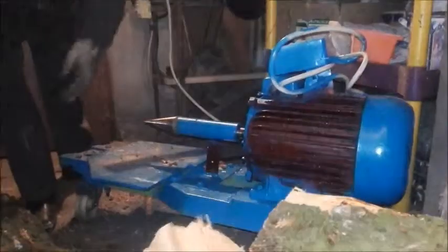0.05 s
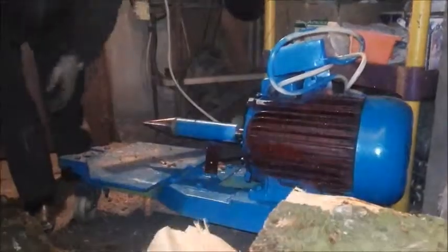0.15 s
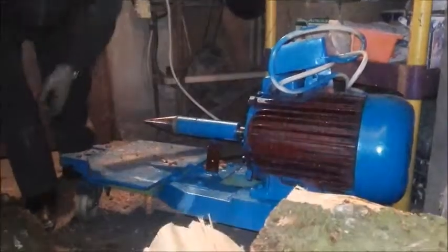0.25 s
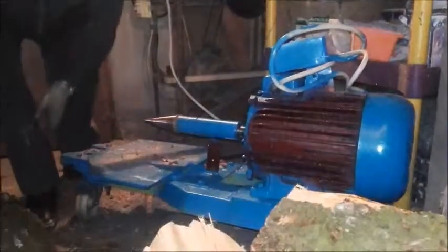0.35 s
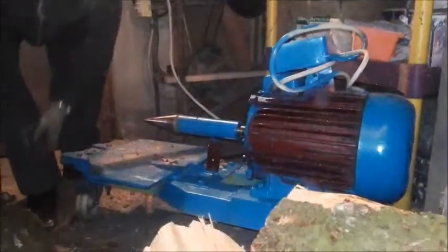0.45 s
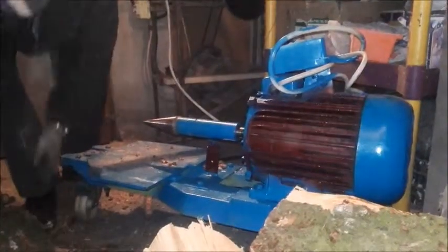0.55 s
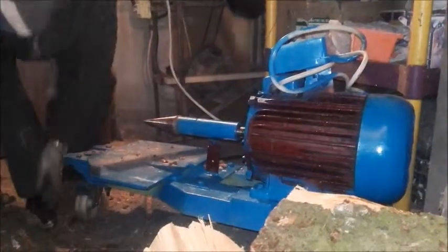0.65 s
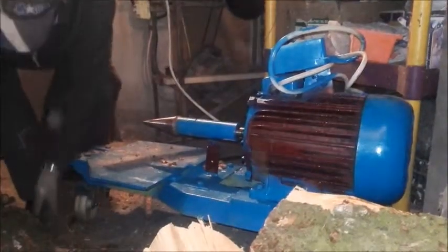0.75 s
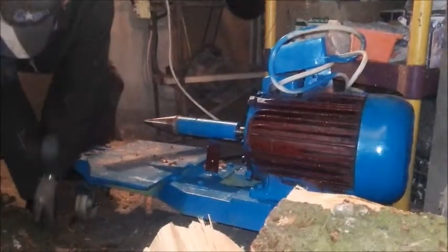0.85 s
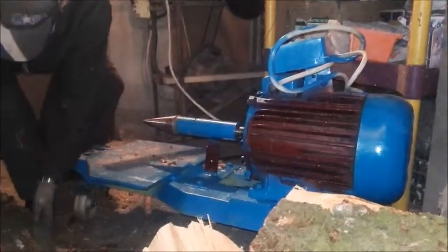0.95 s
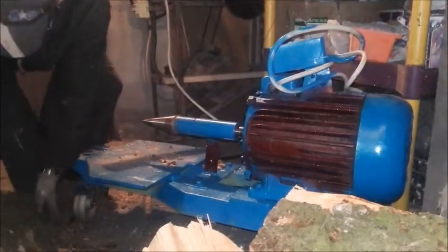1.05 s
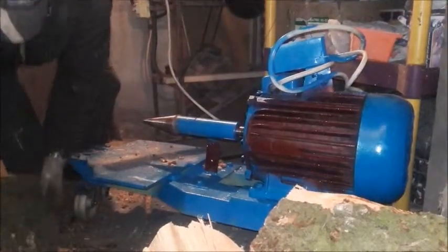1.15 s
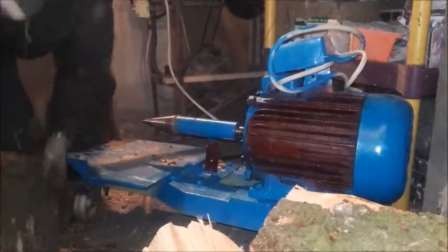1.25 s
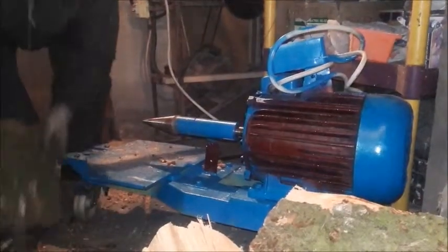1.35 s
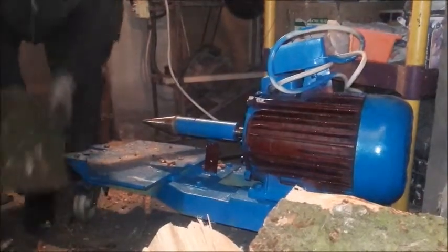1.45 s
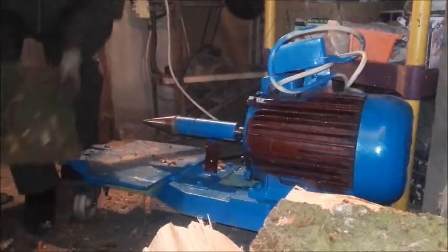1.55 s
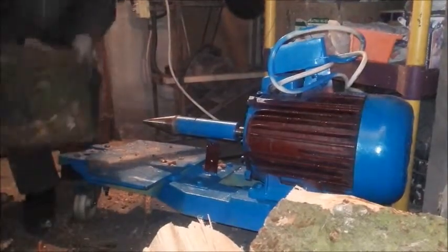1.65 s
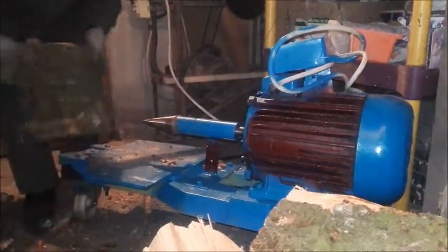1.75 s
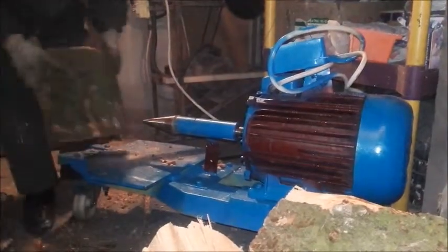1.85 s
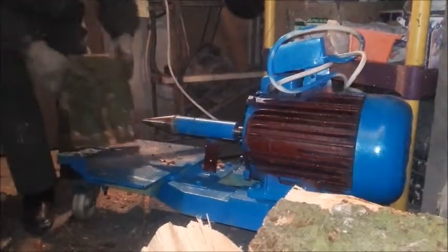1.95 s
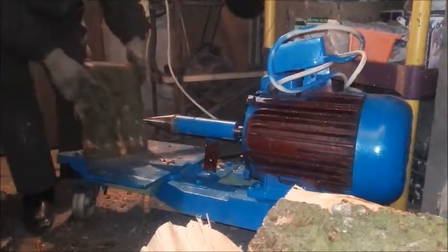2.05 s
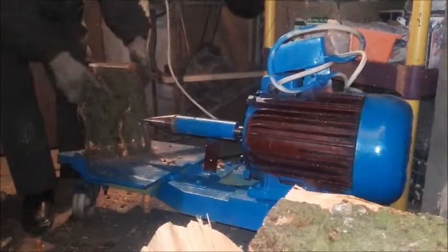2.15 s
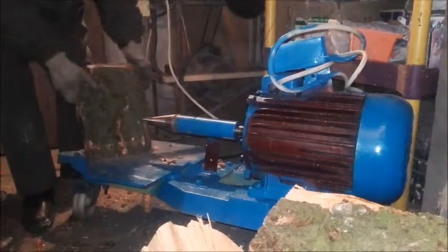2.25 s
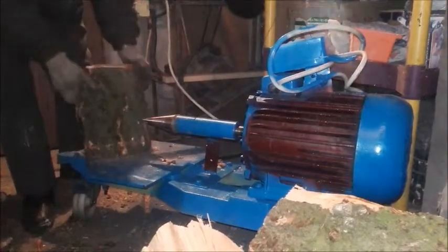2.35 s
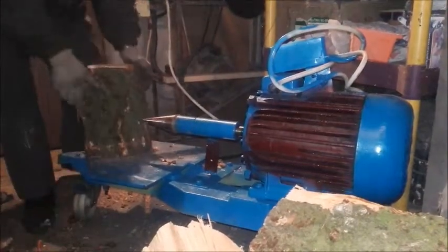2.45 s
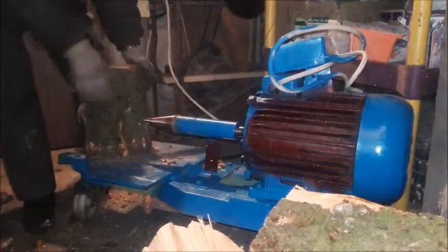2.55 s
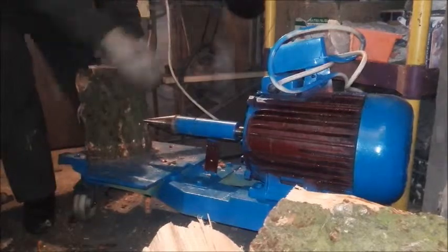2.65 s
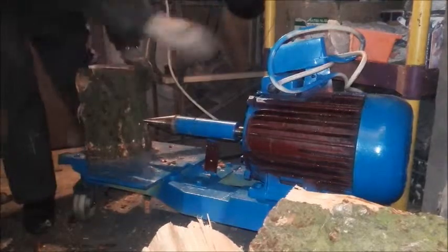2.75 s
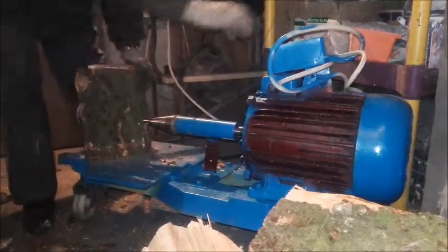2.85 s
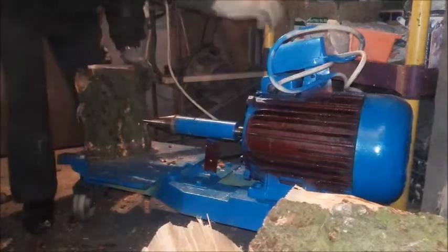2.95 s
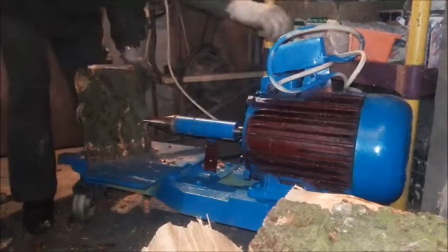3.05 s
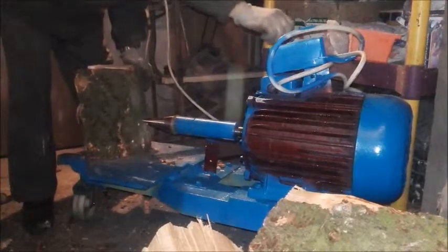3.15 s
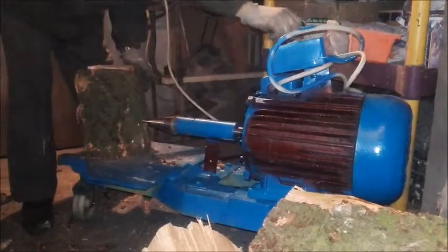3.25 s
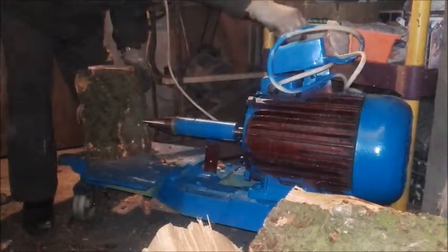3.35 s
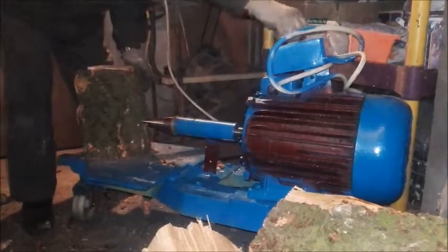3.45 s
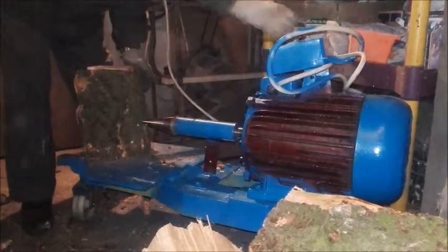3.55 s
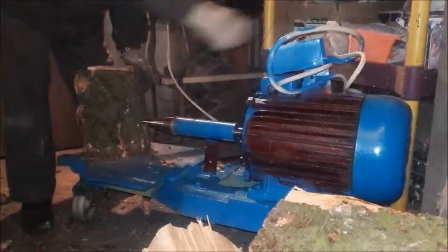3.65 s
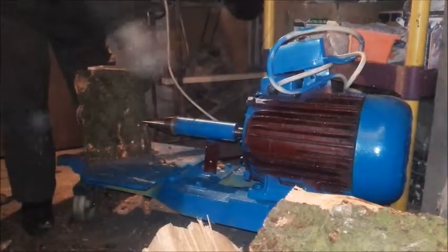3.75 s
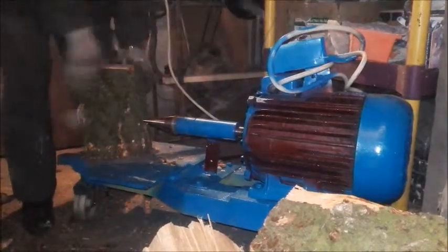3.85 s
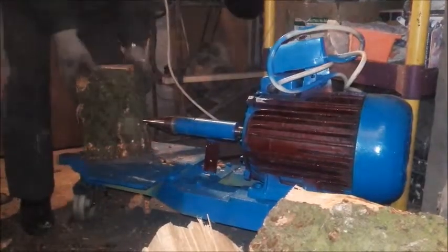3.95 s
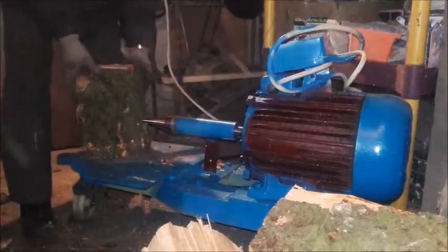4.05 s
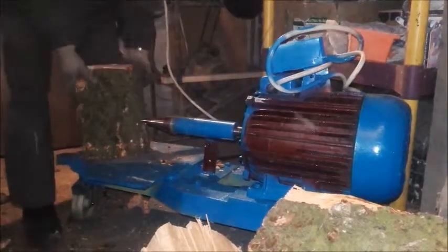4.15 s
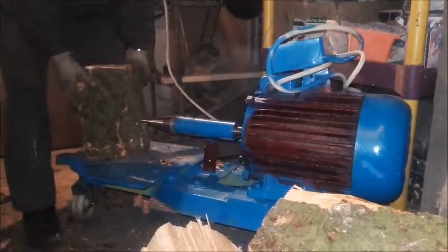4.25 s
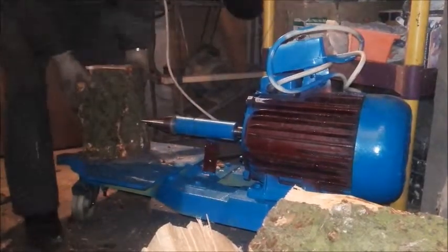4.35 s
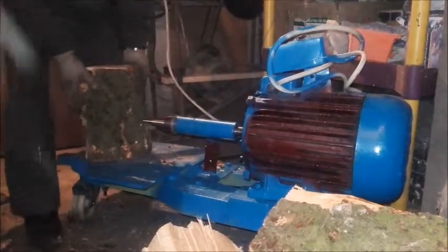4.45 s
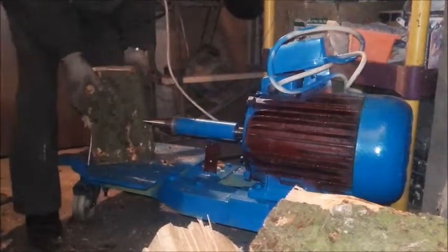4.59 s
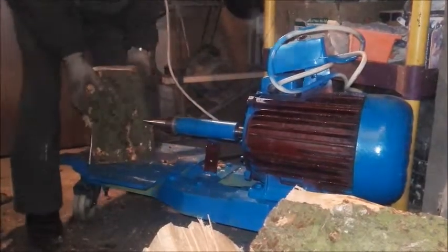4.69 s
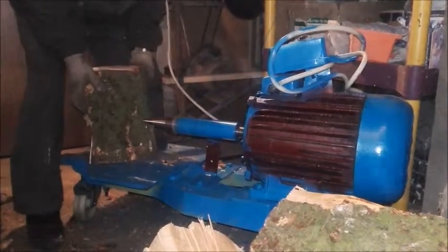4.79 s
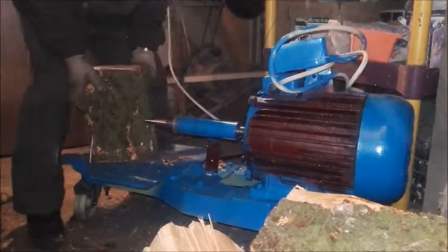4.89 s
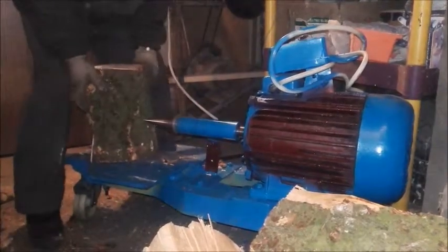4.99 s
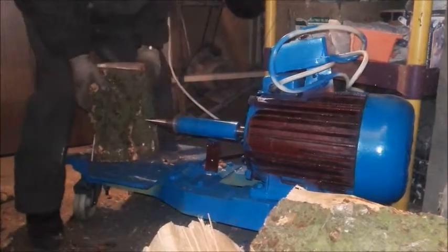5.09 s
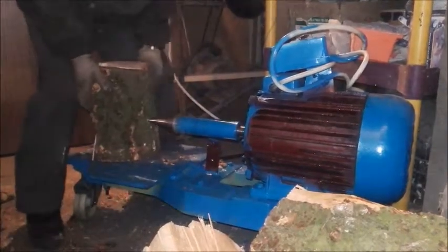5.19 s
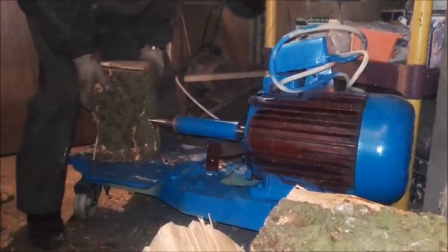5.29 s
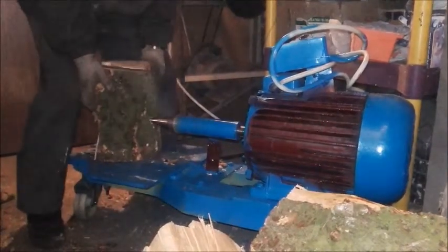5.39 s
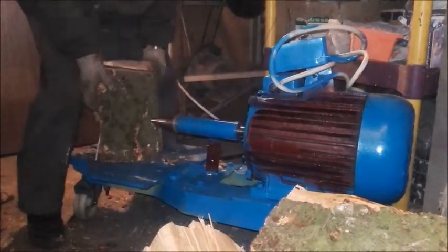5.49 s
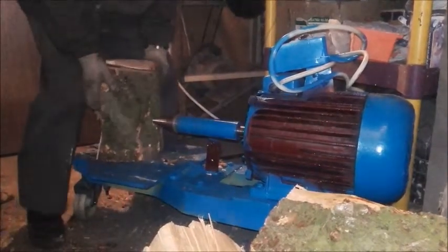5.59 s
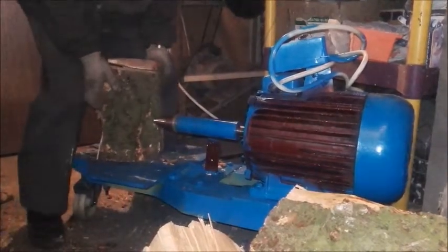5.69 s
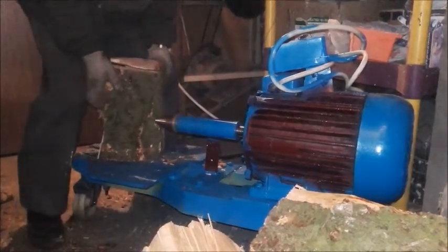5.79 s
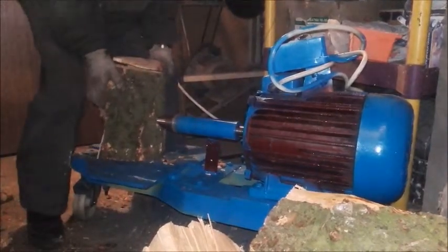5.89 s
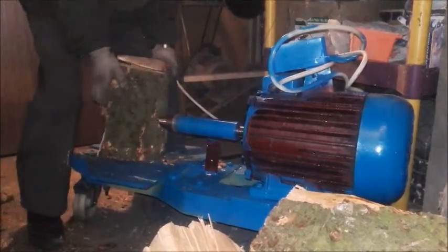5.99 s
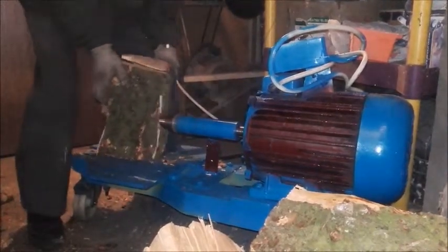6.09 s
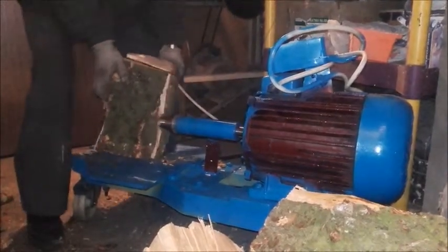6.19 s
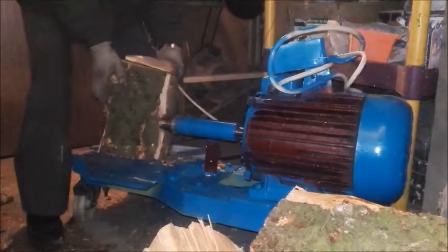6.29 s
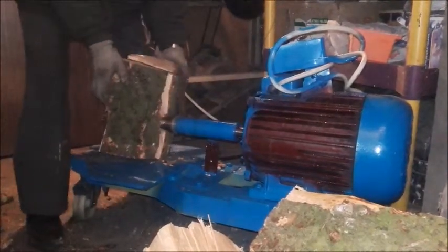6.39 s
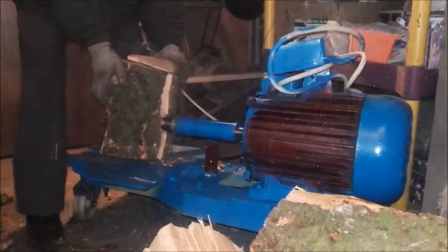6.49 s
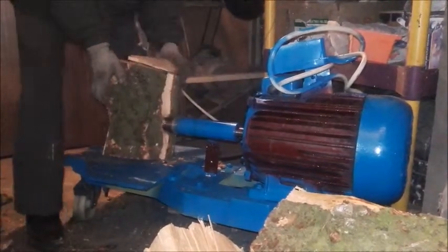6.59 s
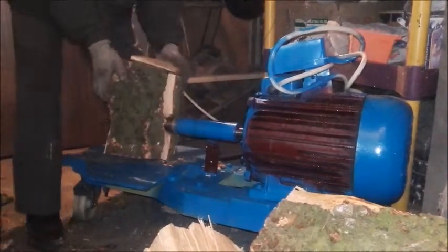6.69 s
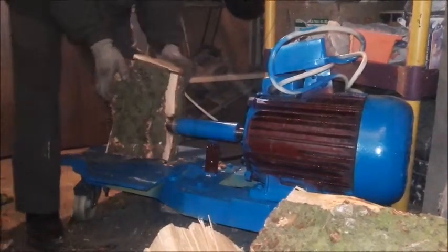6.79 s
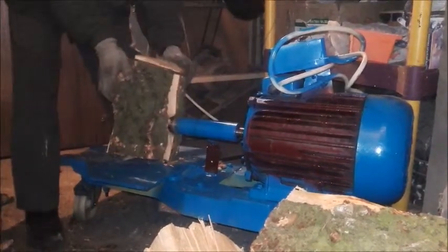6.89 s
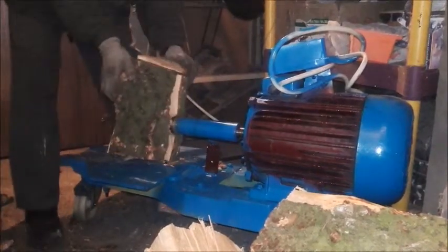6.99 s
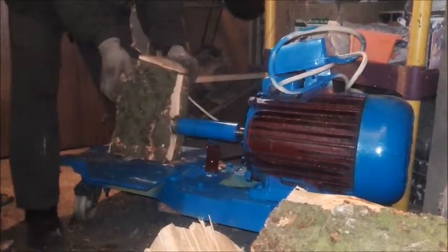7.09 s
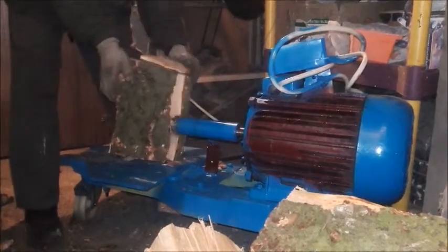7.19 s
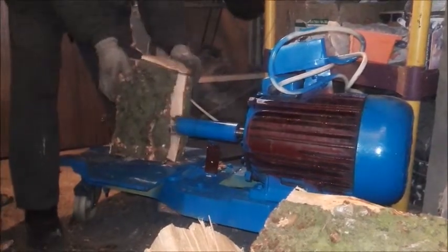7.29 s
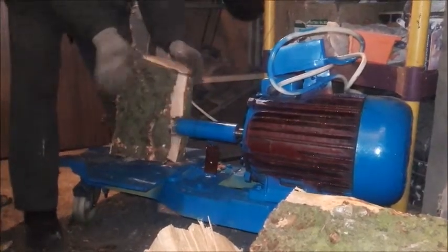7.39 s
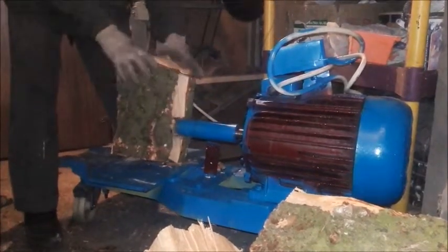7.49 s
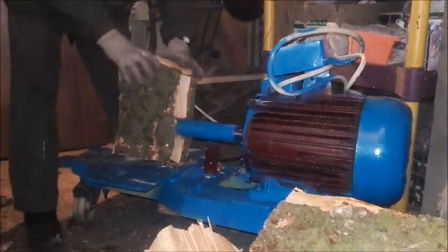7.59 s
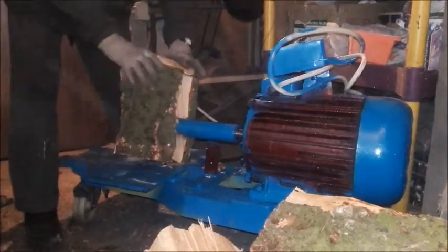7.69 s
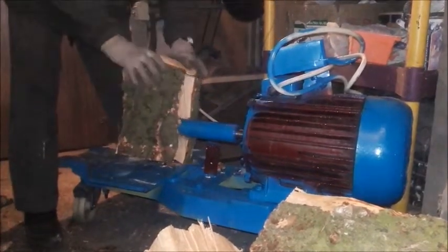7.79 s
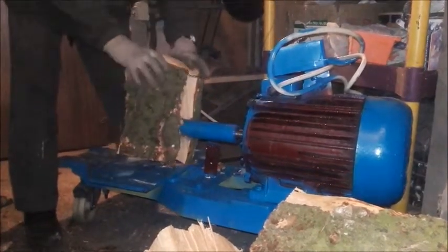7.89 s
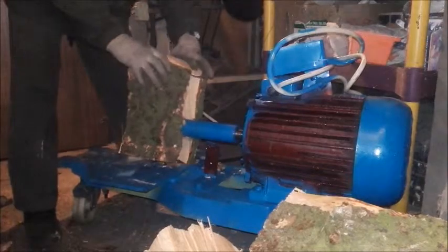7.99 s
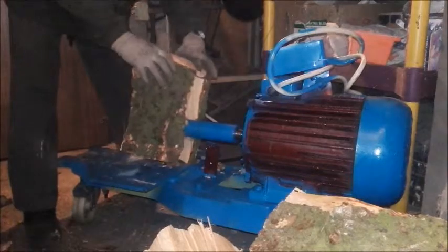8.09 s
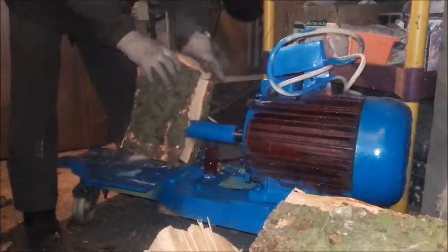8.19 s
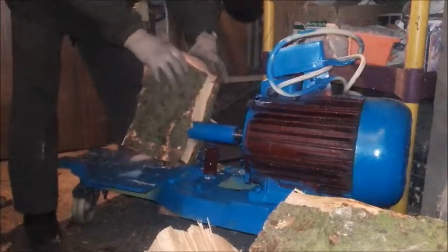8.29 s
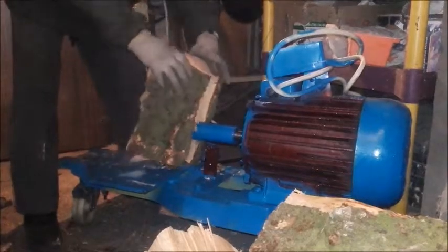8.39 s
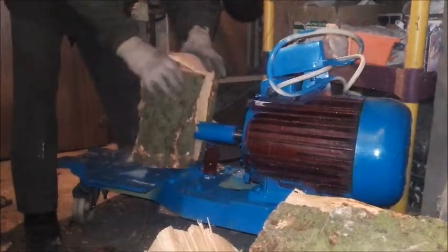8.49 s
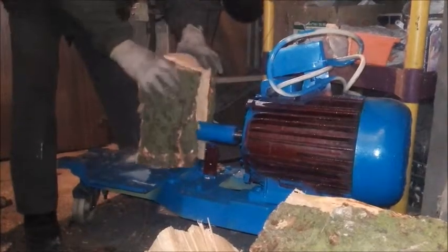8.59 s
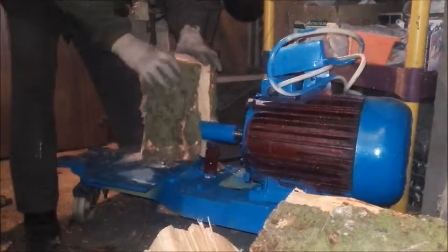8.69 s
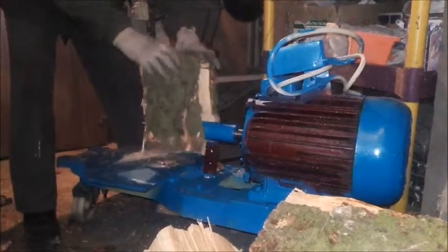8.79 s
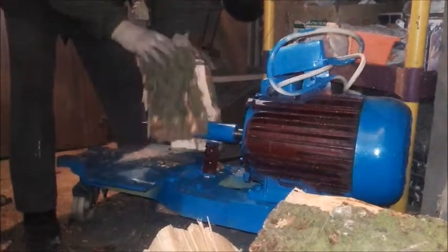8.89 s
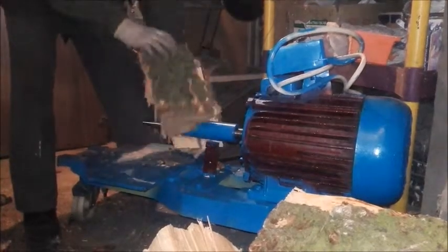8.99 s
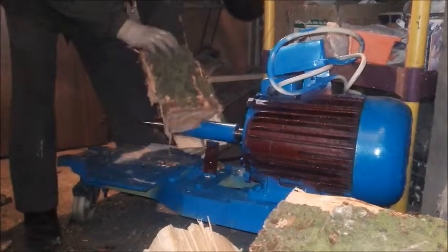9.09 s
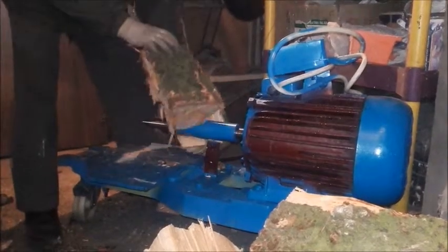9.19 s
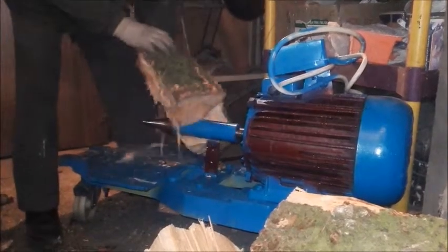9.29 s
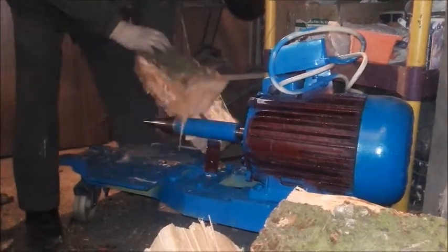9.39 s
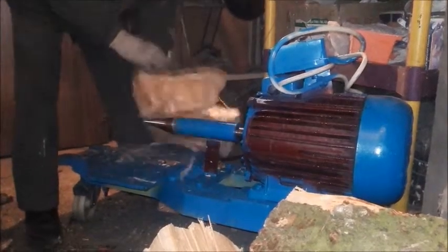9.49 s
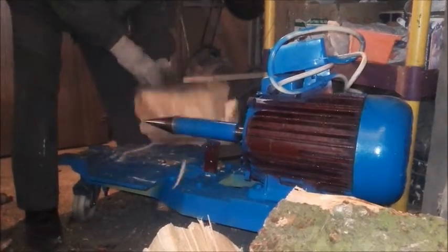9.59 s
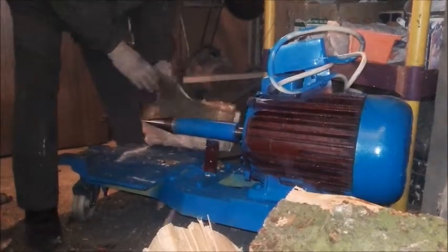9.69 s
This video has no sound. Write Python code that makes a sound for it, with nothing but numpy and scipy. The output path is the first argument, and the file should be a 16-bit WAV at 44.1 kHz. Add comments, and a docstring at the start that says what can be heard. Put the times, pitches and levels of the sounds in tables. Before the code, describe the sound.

Wood knocks and slides, a log thuds onto a ringing steel table, then a motor growls into a steady whine as the log crackles and splits loudly.

```python
"""Screw log splitter in a small shed

A billet knocks and slides on the pile, a log is set on the steel table, and the induction motor starts
with a growl, then whirrs (shaped noise) and whines (lines tied to the shaft). The cone bites, fibres
crackle (random impulses) and the log cracks open (bursts ringing in the wood). Knocks ring the table;
the loudest cracks push an automatic gain down, and it creeps back."""
import sys
import numpy as np
from scipy import signal
from scipy.fft import rfft, irfft
from scipy.io import wavfile
from scipy.ndimage import uniform_filter1d, minimum_filter1d

SR = 44100
rng = np.random.default_rng(int(sys.argv[2]) if len(sys.argv) > 2 else 0)


def to_wav(sig):
    """Store sig (one row per channel, or 1-D mono) as 16-bit WAV at the path in sys.argv[1].

    Samples outside -1..1 are clipped; the rate is SR.
    """
    pcm = np.clip(np.atleast_2d(sig), -1, 1) * 32767
    pcm = np.round(pcm).astype(np.int16)
    wavfile.write(sys.argv[1], SR, pcm.T)  # frames by channels


N = 429534
TIME = np.arange(N) / SR
SWITCH_ON_S = 3.418

# cracks of the log, from faint ticks to loud breaks
# [t/s, crack level/dB, splinter hiss level/dB, length/s, wood resonance f/Hz]
CRACK_EVENTS = [(5.664, -38, -38.5, 0.003, 2600), (5.708, -43, -39, 0.0026, 2600),
                (5.996, -17.5, -27.5, 0.0059, 2120), (6.024, -3.5, -20.5, 0.011, 2320),
                (6.042, -8, -32, 0.025, 1120), (6.08, -4.5, -34, 0.0024, 2000),
                (6.126, -1.5, -35, 0.00096, 2360), (6.151, -11, -33, 0.0045, 2480),
                (6.179, -4.5, -26, 0.0047, 2550), (6.1874, 3, -29, 0.0012, 1970),
                (6.209, 0, -19, 0.0056, 2680), (6.213, -8, -25, 0.019, 820),
                (6.288, -3.5, -23.5, 0.0029, 2030), (6.461, -10.5, -20.5, 0.0033, 2210),
                (6.507, -18, -28, 0.0032, 2400), (7.0, 1.5, -16.5, 0.0052, 2296),
                (7.019, -8, -24, 0.0072, 1700), (7.104, -11, -26, 0.0014, 2260),
                (7.678, -12.5, -24, 0.002, 2750), (7.707, -19, -32, 0.0072, 2940),
                (7.845, -7.5, -21, 0.0042, 1910), (7.918, -13, -24, 0.0041, 2980),
                (7.977, -13.5, -23.5, 0.0042, 2544), (8.755, -21.5, -34, 0.0098, 2510),
                (9.005, -25, -32, 0.0082, 2400), (9.312, -28, -32.5, 0.0058, 2792)]
# spectrum of breaking wood [f/Hz, level/dB]
CRACK_SPECTRUM = [(40, -38), (120, -35), (300, -1.5), (700, 6.5), (1500, 3.5), (2900, 6), (3400, -4.5),
                  (4000, -14), (5000, -16.5), (7000, -72), (16000, -90)]
# spectrum of the finest splinters [f/Hz, level/dB]
SPLINTER_SPECTRUM = [(1500, -21), (3000, 5), (4600, 2.5), (6800, -8), (8500, -3), (10300, 7), (12500, 1.5),
                     (16000, -8)]
# spectrum of a hard knock on a log [f/Hz, level/dB]
KNOCK_SPECTRUM = [(40, -31), (90, -16), (160, -5.5), (260, -2.5), (600, -2), (1200, 0), (2600, 4.5),
                  (3200, -4), (3900, -11), (6800, -25), (10500, -15), (16000, -19.5)]


def undb(db):
    """Decibels to gain."""
    return 10 ** (np.asarray(db) / 20)


def unit(x):
    """Scale to rms 1."""
    return x / np.sqrt(np.mean(x ** 2))


def curves(table):
    """Columns of a (t/s, ..) table, joined by straight lines."""
    s, *columns = np.transpose(table)
    return [np.interp(TIME, s, column) for column in columns]


def walk(rate_hz):
    """Random points, rate_hz a second, joined by straight lines; rms 1."""
    points = rng.standard_normal(4096)
    return unit(np.interp(TIME * rate_hz, np.arange(len(points)), points))


def swell(s, attack_s, hold_s, release_s):
    """Envelope that grows to 1 at time s, holds, then dies away; attack and release are time constants."""
    rise = np.minimum(TIME - s, 0) / attack_s
    fall = np.maximum(TIME - s - hold_s, 0) / release_s
    return np.exp(rise - fall)


def colour(x, spectrum, size=4096):
    """Causal minimum-phase filter with the given (f/Hz, level/dB) response."""
    hz, db = np.transpose(spectrum)
    bins_hz = np.maximum(np.fft.rfftfreq(size, 1 / SR), 1)
    response_db = np.interp(np.log(bins_hz), np.log(hz), db)
    # fold the cepstrum onto positive time
    cepstrum = irfft(np.log(undb(response_db)))
    cepstrum[1:size // 2] *= 2
    cepstrum[size // 2 + 1:] = 0
    impulse = irfft(np.exp(rfft(cepstrum)))
    return signal.oaconvolve(x, impulse)[:len(x)]


def resonate(x, hz, width_hz):
    """One resonance, gain 1 at its centre."""
    return signal.lfilter(*signal.iirpeak(hz, hz / width_hz, fs=SR), x)


def butter(x, order, hz, kind):
    """Butterworth filter."""
    return signal.sosfilt(signal.butter(order, hz, kind, fs=SR, output="sos"), x)


def add(track, s, x):
    """Mix x into the track from time s."""
    start = int(s * SR)
    track[start:start + len(x)] += x[:N - start]


def burst(length_s, spread_db, size=16384):
    """Cluster of tiny uneven impacts that dies away after about length_s."""
    sign, strength = rng.standard_normal((2, size))
    decay = np.exp(-(TIME[:size] / length_s) ** 2)
    return np.sign(sign) * undb(spread_db * strength) * decay


def blow(x, db, length_s):
    """Give x the energy of a sound of this level lasting length_s."""
    return x * undb(db) * np.sqrt(length_s * SR / np.sum(x ** 2))


def crackle(rate_hz, spread_db, rub_db):
    """Fibres snapping at random, many small and a few large, over smooth rubbing noise."""
    snapping = rng.random(N) < rate_hz / SR
    size = np.minimum(rng.exponential(size=N), 4.5)
    fibres = snapping * undb(spread_db * size) * rng.choice([-1, 1], N)
    return unit(fibres) + undb(rub_db) * rng.standard_normal(N)


def tone(cycles, waver, rate_hz):
    """Line of rms near 1 whose strength and phase waver."""
    phase = 2 * np.pi * (cycles - np.floor(cycles))
    in_phase = (1 + waver * walk(rate_hz)) * np.cos(phase)
    quadrature = waver * walk(rate_hz) * np.sin(phase)
    return np.sqrt(2 / (1 + 2 * waver ** 2)) * (in_phase + quadrature)


def shed(x, wet_db, gap_s=0.0013, split_hz=3500, t60_s=0.45, treble_t60_s=0.27):
    """Direct sound plus dense reflections off close plank walls; the treble dies first."""
    t = TIME[:SR // 2]
    decay = -np.log(1000) * t
    low = butter(rng.standard_normal(len(t)), 2, split_hz, "low") * np.exp(decay / t60_s)
    high = butter(rng.standard_normal(len(t)), 2, split_hz, "high") * np.exp(decay / treble_t60_s)
    tail = (low + high) * (1 - np.exp(-(t / gap_s) ** 2))
    tail = tail / np.sqrt(np.sum(tail ** 2))
    return x + undb(wet_db) * signal.oaconvolve(x, tail)[:N]


def motor():
    """Fan and bearings whirr and ring the housing; hum and whine follow the shaft and shift with side load."""
    # shaft speed, sagging while the cone wedges the log open [t/s, speed/(turns/s)]
    shaft = [(3.42, 20), (3.50, 24.98), (5.4, 24.98), (5.98, 24.85), (6.07, 24.3), (6.19, 24.15),
             (6.33, 24.85), (6.5, 24.97), (9.74, 24.98)]
    # side load on the bearings as the log is pushed onto the cone [t/s, share 0-1]
    side_load = [(3.7, 0.09), (4.6, 0.06), (5.1, 0.06), (5.7, 0.13), (6.7, 0.67), (8.6, 1)]
    # magnetic hum and bearing whine at free speed [f/Hz, unloaded level/dB, loaded level/dB]
    lines = [(124.9, -56, -57), (249.8, -46, -45), (562, -45, -47), (787, -50, -47), (899.2, -41, -48),
             (924.3, -43, -51), (1363, -47, -40), (1464, -46, -40), (1634, -40, -44), (1659, -39, -43),
             (1768, -43, -45), (2069, -49, -48), (2176.5, -40, -35), (2715, -56, -48), (2916, -50, -49),
             (7100, -82, -82), (9798, -69, -66), (12597, -80, -80)]
    # fan and bearing noise, unloaded [f/Hz, level/dB]
    free_spectrum = [(40, -45), (70, -27), (130, -17.5), (220, -2.5), (380, 2), (520, 0.5), (680, 1),
                     (1050, 5.5), (1450, -2.5), (2100, -1), (3150, -0.5), (3800, -18), (6500, -47),
                     (10500, -41.5), (16000, -48)]
    # fan and bearing noise under side load [f/Hz, level/dB]
    loaded_spectrum = [(40, -49), (70, -26), (130, -17.5), (220, -3), (380, -1.5), (560, 0), (1100, 3),
                       (1500, -3.5), (2750, 2), (3200, -4.5), (3800, -19), (6800, -41), (10500, -23),
                       (16000, -33.5)]
    # housing resonances, each filtered twice [f/Hz, width per pass/Hz, level/dB]
    housing = [(538, 170, -7), (1637.4, 34, 4), (1722, 112, -2.5), (2145, 40, -2)]
    free_turns_per_s = 24.98
    surge_s, attack_s, hold_s, release_s = 3.47, 0.013, 0.043, 0.06

    load = np.clip(curves(side_load)[0], 0, 1)
    speed = curves(shaft)[0]
    turns = np.cumsum(speed) / SR
    running = (TIME > SWITCH_ON_S) * swell(surge_s, attack_s, N / SR, release_s)
    # inrush surge: full until just after the shaft reaches speed, then dies away
    surge = np.exp(-np.maximum(TIME - surge_s - hold_s, 0) / release_s)

    free = unit(colour(rng.standard_normal(N), free_spectrum))
    loaded = unit(colour(rng.standard_normal(N), loaded_spectrum))
    noise = np.sqrt(1 - load) * free + np.sqrt(load) * loaded
    # the bearings rub harder once and twice a turn
    throb = 1 + 0.065 * np.sin(2 * np.pi * turns) + 0.046 * np.sin(2 * np.pi * 2 * turns)
    whirr = unit(shed(noise, wet_db=-8.5)) * throb
    whirr_db = -29 + 9.5 * surge + 4 * load + 0.19 * walk(9.5)

    rolling = rng.standard_normal(N)
    ring = 0
    for hz, width_hz, db in housing:
        ring = ring + undb(db) * resonate(resonate(rolling, hz, width_hz), hz, width_hz)
    # ring relative to whirr: side load damps it, and it falls 46 dB per turn/s of slowing
    ring_db = -1.5 - 6.5 * np.maximum(load, surge) - 46 * (free_turns_per_s - speed)

    whine = 0
    for hz, free_db, loaded_db in lines:
        line_db = free_db + load * (loaded_db - free_db)
        whine = whine + undb(line_db) * tone(hz * turns / free_turns_per_s, waver=0.43, rate_hz=6.5)
    return running * (undb(whirr_db) * (whirr + undb(ring_db) * unit(ring)) + whine)


def shudder():
    """The frame growls under the inrush current at switch-on, and again as the log is wrenched apart."""
    # growl lines of the frame [f/Hz, level/dB]
    growl_lines = [(492, -1), (570, -4), (675, -7.5)]
    # shaking of the frame [t/s, level/dB, attack/s, hold/s, release/s]
    shakes = [(3.451, -14.5, 0.0083, 0.019, 0.064), (9.023, -24.5, 0.05, 0.05, 0.035),
              (9.636, -29.5, 0.008, 0.07, 0.06)]
    growl = sum(undb(db) * tone(hz * TIME, waver=0.39, rate_hz=90) for hz, db in growl_lines)
    shaken = sum(undb(db) * swell(s, attack_s, hold_s, release_s)
                 for s, db, attack_s, hold_s, release_s in shakes)
    return unit(growl) * shaken * (TIME > SWITCH_ON_S)


def cracks(ring_db=5.0, ring_width_hz=600, after_db=-11, after_lengths=4.6):
    """Each crack is a run of snapping fibres that rings the wood and throws off a hiss of splinters."""
    out = np.zeros(N)
    for s, db, hiss_db, length_s, hz in CRACK_EVENTS:
        # the split runs on after the main break, for a few times its length
        main_break = burst(length_s, spread_db=5.0)
        run_on = burst(after_lengths * length_s, spread_db=7.0)
        snaps = main_break + undb(after_db) * run_on
        body = colour(snaps, CRACK_SPECTRUM)
        ringing = body + undb(ring_db) * resonate(body, hz, ring_width_hz)
        add(out, s, blow(ringing, db, length_s))
        add(out, s, blow(colour(snaps, SPLINTER_SPECTRUM), hiss_db, length_s))
    return shed(out, wet_db=-6.0)


def tearing(tear_db=-33, snap_db=-21, flick_db=-1, uneven_db=0.6):
    """The thread rubs wet wood and tears fibres, more around each crack; thick ones snap in the main split."""
    # fibres rubbing on the thread as the cone bites deeper [t/s, level/dB]
    rub_levels = [(4.9, -85), (5.4, -65), (5.8, -51), (6.7, -57.5), (7.2, -44), (8.3, -47), (9.6, -47),
                  (9.74, -50.5)]
    # strained fibres: level re each crack's splinter hiss, build-up and let-go
    strained_db, strained_attack_s, strained_release_s = -22.5, 0.051, 0.1

    split = swell(6.05, attack_s=0.022, hold_s=0.25, release_s=0.035)
    # the thread grips and slips
    rub_db = curves(rub_levels)[0] + uneven_db * walk(9.8)
    rubbing = undb(rub_db) * (TIME > rub_levels[0][0])
    strained_power = 0
    for s, _, hiss_db, length_s, _ in CRACK_EVENTS:
        strain = swell(s, strained_attack_s, length_s, strained_release_s)
        strained_power = strained_power + (undb(hiss_db + strained_db) * strain) ** 2
    effort = np.sqrt(rubbing ** 2 + strained_power + (undb(tear_db) * split) ** 2)

    fibres = colour(crackle(rate_hz=350, spread_db=1.5, rub_db=2.5), SPLINTER_SPECTRUM)
    # lone splinters flick off the cone
    flicks = colour(crackle(rate_hz=20, spread_db=2.5, rub_db=-30), SPLINTER_SPECTRUM)
    snaps = colour(crackle(rate_hz=240, spread_db=5.0, rub_db=-12), CRACK_SPECTRUM)
    return (unit(shed(fibres, wet_db=2.5)) * effort
            + unit(shed(flicks, wet_db=-4)) * undb(flick_db) * rubbing
            + unit(shed(snaps, wet_db=-6.0)) * undb(snap_db) * split)


def steel_table(plate_db=1, plate_t60_s=0.32, plate_low_hz=330, plate_top_hz=1050, radiates_hz=210):
    """Ring of the table: a few frame modes over the crowded modes of the plate; it radiates little bass."""
    # modes of the steel table and frame [f/Hz, level/dB, t60/s]
    modes = [(248, -11, .48), (345, -4, .4), (411, -4, .36), (465, -3, .3), (565, 0, .28), (624, -4, .28),
             (824, -1, .2), (950, -5, .22), (1333, -8, .27), (1625, -3, .2), (2288, -14, .2)]
    t = TIME[:SR // 2]
    decay = -np.log(1000) * t
    frame = 0
    for hz, db, t60_s in modes:
        frame = frame + undb(db) * np.sin(2 * np.pi * (hz * t + rng.random())) * np.exp(decay / t60_s)
    plate = butter(rng.standard_normal(len(t)), 3, [plate_low_hz, plate_top_hz], "band")
    plate = plate * np.exp(decay / plate_t60_s)
    return butter(unit(frame) + undb(plate_db) * unit(plate), 4, radiates_hz, "high")


def knocks(ring_rise=0.4):
    """Each knock is a cluster of rough contacts, low-passed when soft, that also sets the table ringing."""
    # wood on wood, floor or table [t/s, level/dB, contact length/s, dull above f/Hz, ring re knock/dB]
    contacts = [(0.013, -30.5, 0.009, 3500, -20), (0.022, -21.5, 0.006, 13000, -35),
                (0.042, -22.5, 0.023, 11000, -31), (0.08, -22.5, 0.0056, 12800, -28),
                (0.189, -31, 0.0026, 10000, -31), (0.22, -29.5, 0.0038, 5030, -16),
                (0.297, -42.5, 0.0097, 1500, -22), (0.301, -44, 0.0086, 105, -30),
                (1.186, -61, 0.013, 1500, -16), (1.213, -58, 0.064, 2500, -3.5),
                (2.246, -20, 0.0037, 3500, 3), (2.25, -22.5, 0.03, 4500, 10),
                (2.866, -61.5, 0.021, 1500, -2), (8.791, -27, 0.011, 3506, -16),
                (9.0, -25, 0.034, 1200, -2), (9.632, -20, 0.025, 3200, -3.5), (9.693, -31, 0.046, 1200, 0)]
    table = steel_table()
    wood, steel = np.zeros((2, N))
    for s, db, length_s, dull_hz, ring_db in contacts:
        contact = colour(burst(length_s, spread_db=3.5), KNOCK_SPECTRUM)
        softened = butter(contact, 2, min(dull_hz, SR / 3), "low")
        add(wood, s, blow(softened, db, length_s))
        # the ring builds up over a share of the contact
        build_up = 1 - np.exp(-TIME[:len(table)] / (ring_rise * length_s))
        add(steel, s, blow(table * build_up, db + ring_db, length_s))
    return shed(wood, wet_db=-6.5) + steel


def sliding(level_db=-37, stop_s=0.32, stop_fade_s=0.06):
    """The billet scrapes over the pile between its knocks and comes to rest."""
    bark = colour(crackle(rate_hz=1500, spread_db=9.5, rub_db=-4.5), KNOCK_SPECTRUM)
    motion = swell(0.012, attack_s=0.0012, hold_s=0.039, release_s=0.17)
    motion = motion * np.clip((stop_s - TIME) / stop_fade_s, 0, 1)
    return unit(shed(bark, wet_db=6)) * undb(level_db) * motion


def quiet(level_db=-66.5):
    """Faint room noise and microphone hiss: shaped noise whose level wanders."""
    # noise spectrum [f/Hz, level/dB]
    spectrum = [(40, -10), (120, -5), (400, 0), (1000, -5), (2100, -6), (2700, -2), (4000, -17),
                (6500, -22), (10500, -17), (16000, -17)]
    return unit(colour(rng.standard_normal(N), spectrum)) * undb(level_db + walk(2.2))


def scene():
    """Everything in the shed, heard at one microphone."""
    return (motor() + shudder() + cracks() + tearing() + knocks() + sliding() + quiet())[None]


def gain_control(x, ceiling_db=-9.0, hold_s=0.28, recovery_db_per_s=4.0, size=300):
    """The gain drops at once when the sound passes the ceiling, waits, and climbs back at a steady rate."""
    power = np.maximum(uniform_filter1d(x[0] ** 2, size), 1e-12)
    excess_db = np.maximum(10 * np.log10(power) - ceiling_db, 0)
    hold = int(hold_s * SR)
    # largest excess over the past hold time
    held_db = -minimum_filter1d(-excess_db, hold, origin=(hold - 1) // 2)
    climb_db = recovery_db_per_s * TIME
    return x * undb(climb_db - np.maximum.accumulate(held_db + climb_db))


def record(dry, clip=0.92, rumble_hz=55, top_hz=16000):
    """Ride the gain, clip the tallest spikes, cut the rumble and the top."""
    clipped = np.clip(gain_control(dry), -clip, clip)
    rumble_free = butter(clipped, 4, rumble_hz, "high")
    return signal.sosfilt(signal.ellip(10, .2, 80, top_hz, fs=SR, output="sos"), rumble_free)


dry = scene()
out = record(dry)
to_wav(out)
```